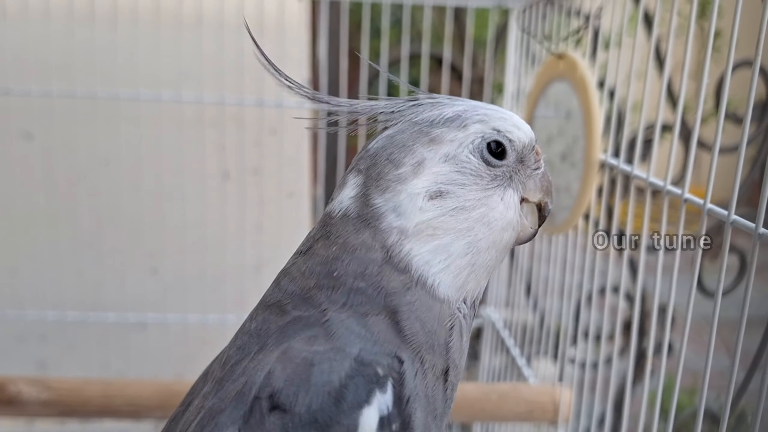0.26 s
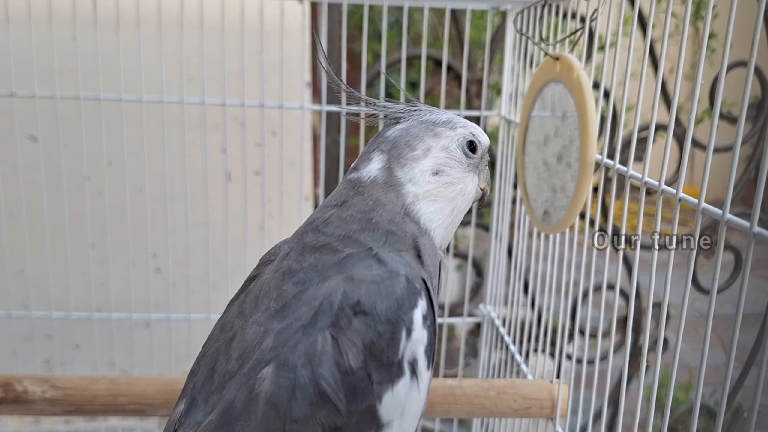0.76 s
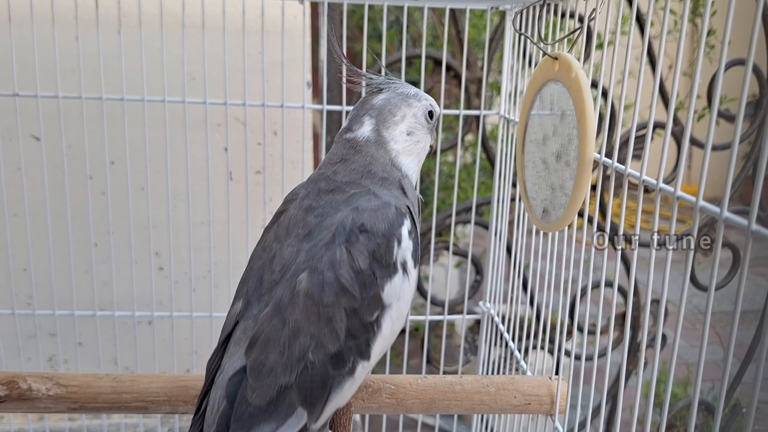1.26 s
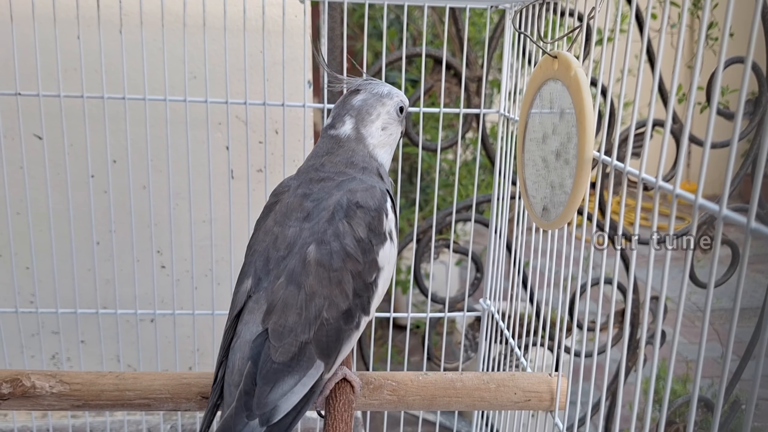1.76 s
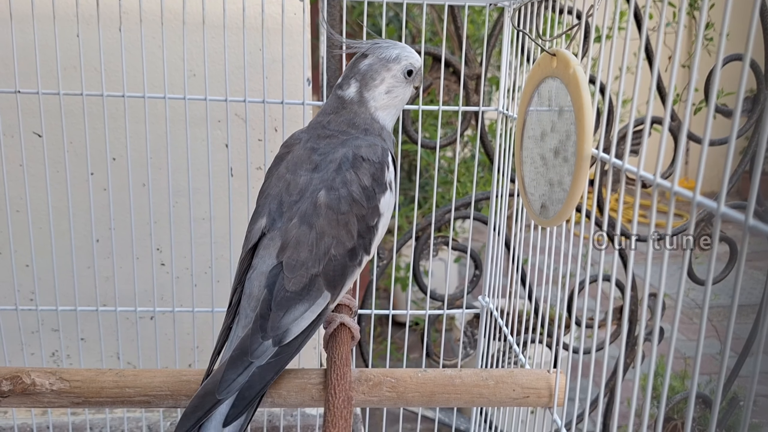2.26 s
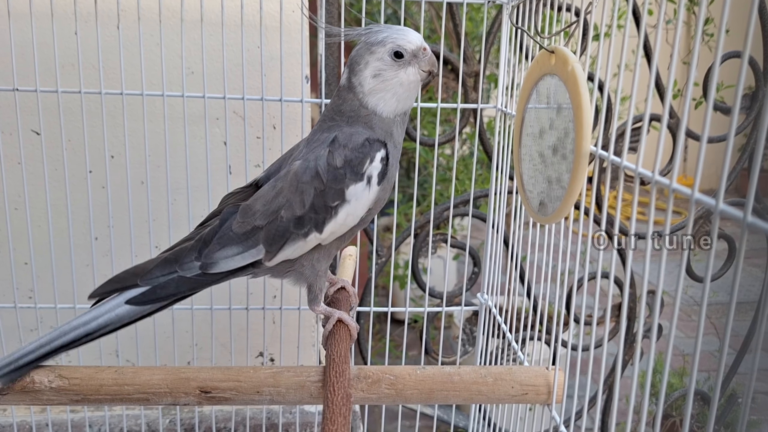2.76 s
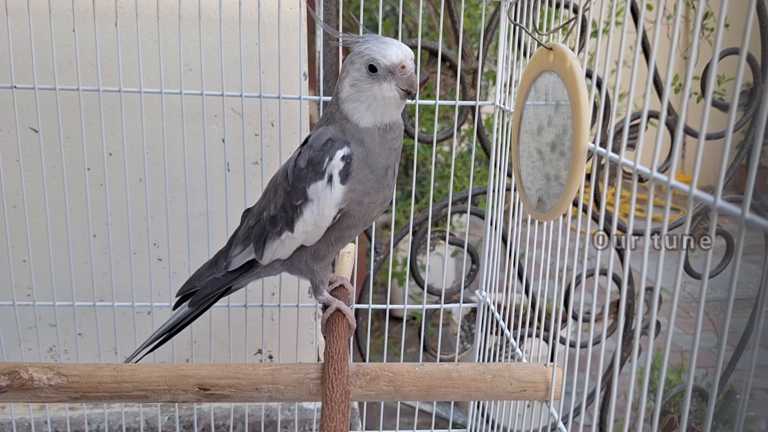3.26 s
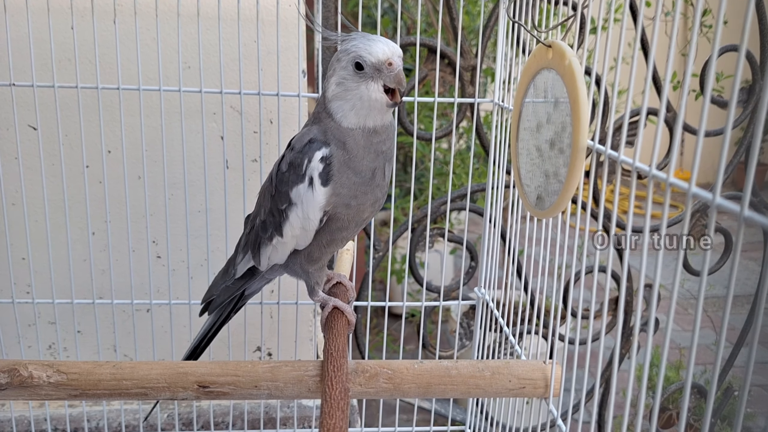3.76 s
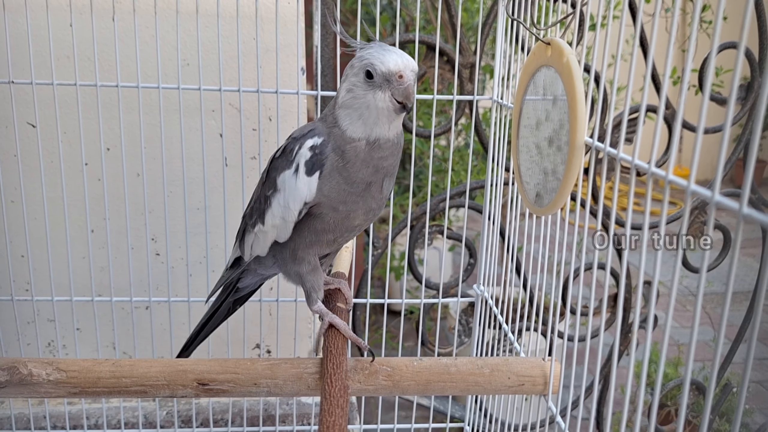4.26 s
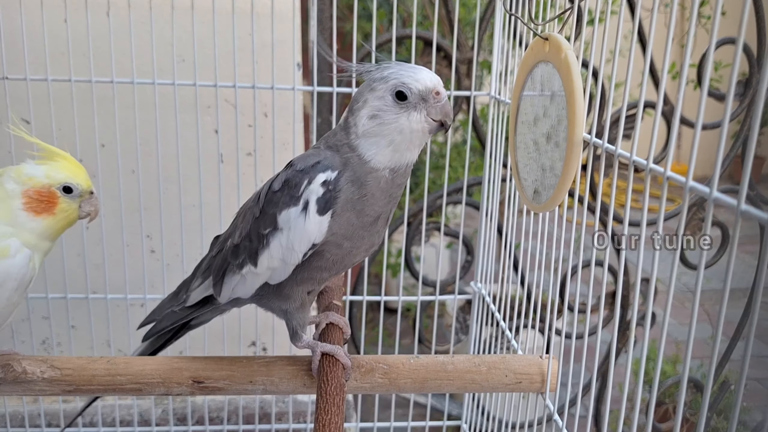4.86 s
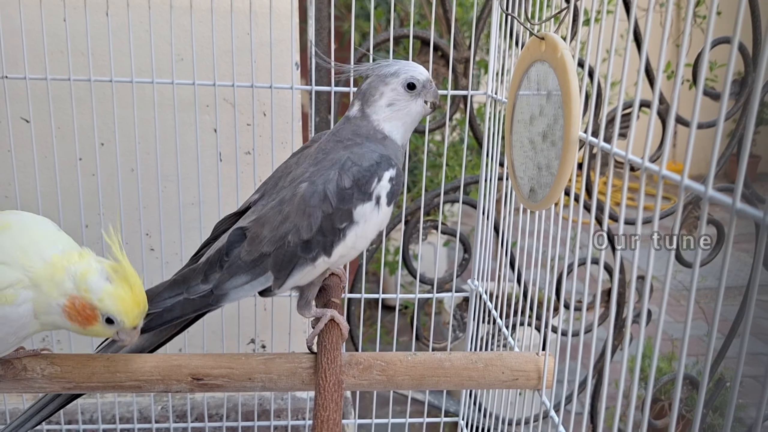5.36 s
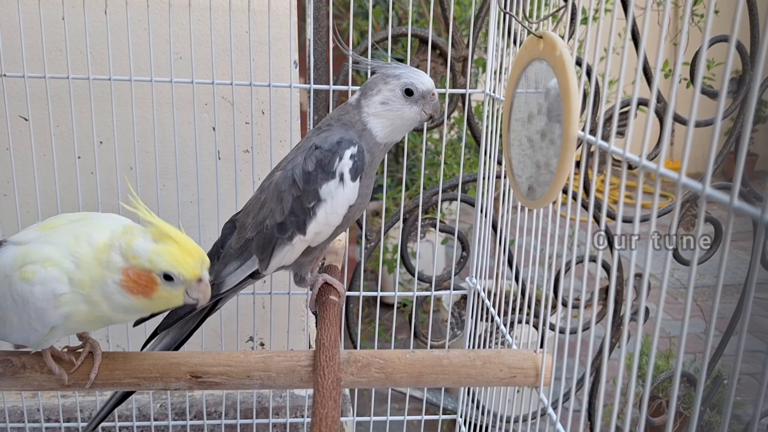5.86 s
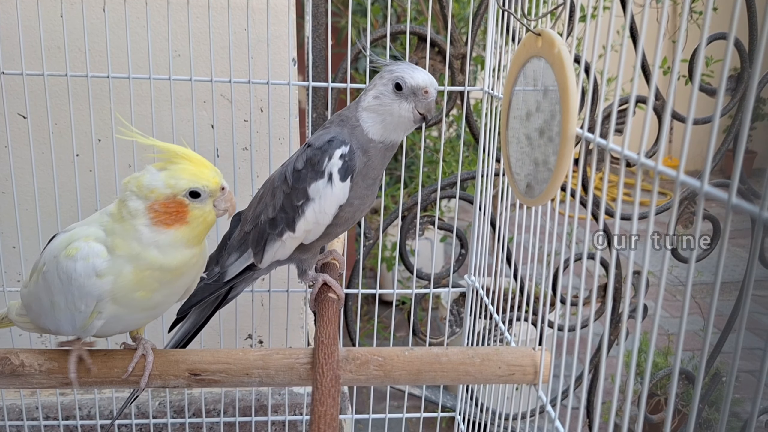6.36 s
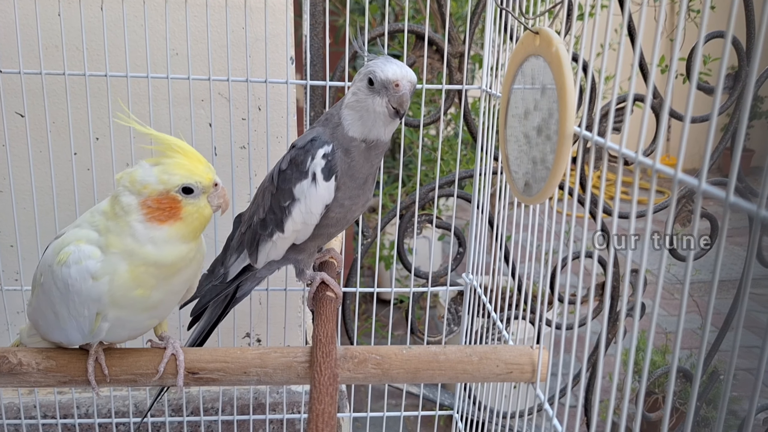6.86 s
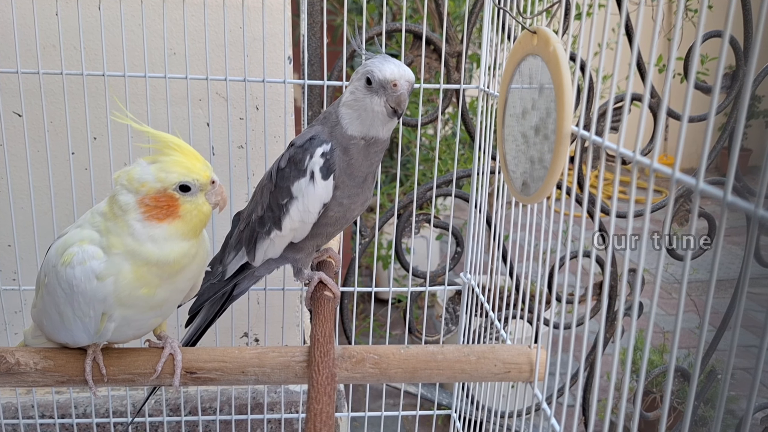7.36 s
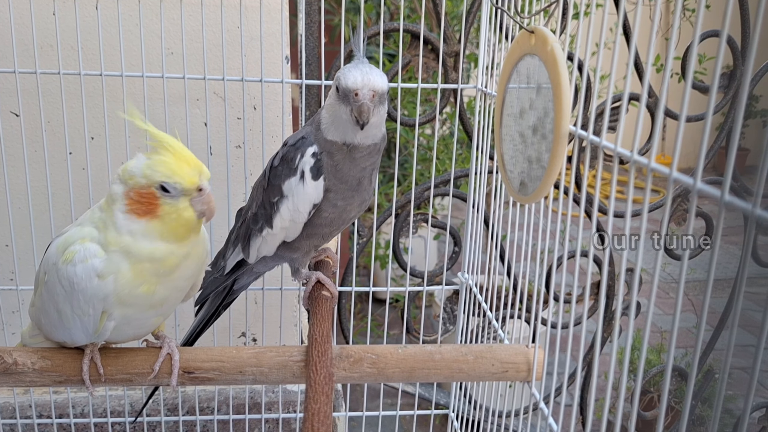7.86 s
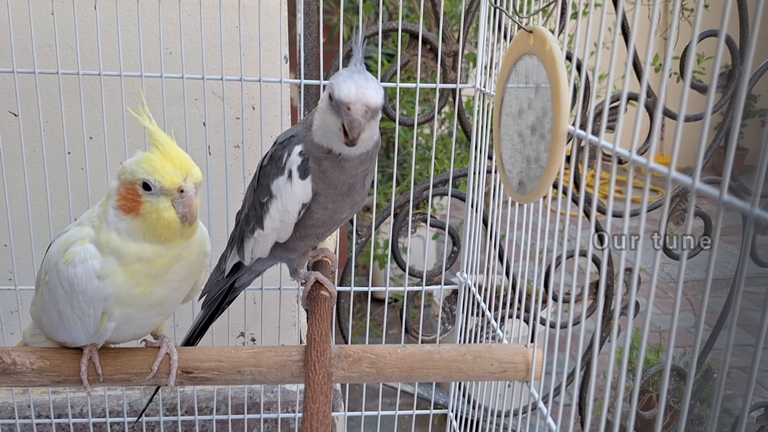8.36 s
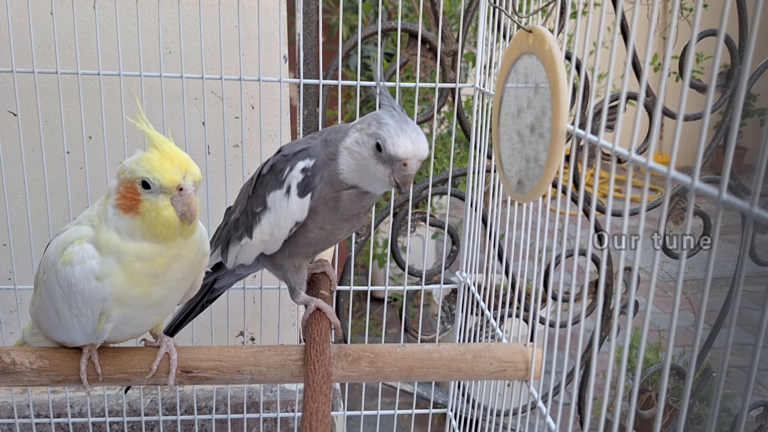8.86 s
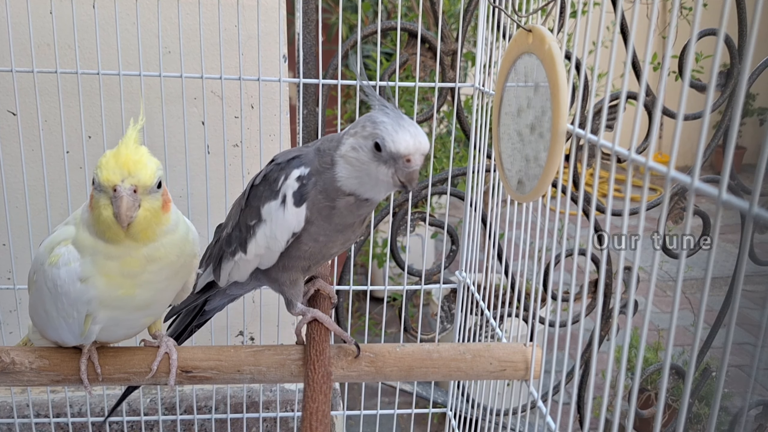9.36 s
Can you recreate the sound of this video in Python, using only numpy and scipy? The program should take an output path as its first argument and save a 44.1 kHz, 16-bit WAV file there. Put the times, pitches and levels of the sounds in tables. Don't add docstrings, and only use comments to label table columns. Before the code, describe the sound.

Outdoors between hard walls, a caged cockatiel opens with a loud, fast whistled run, then gives spaced swoops, a short trill and ringing high peals. Two breathy croaks interrupt before more sliding whistles and a late repeat of the opening run. Close, clear stereo pickup catches slight wall echo, feather rustle and small wire ticks, with distant sparrows and low rumble behind.

```python
import sys
import numpy as np
from scipy import signal
from scipy.fft import rfft, irfft, next_fast_len
from scipy.io import wavfile
from scipy.ndimage import uniform_filter1d, minimum_filter1d, map_coordinates

SR = 44100
rng = np.random.default_rng(int(sys.argv[2]) if len(sys.argv) > 2 else 0)


def wrap_up_sound(samples):
    columns = np.atleast_2d(samples).T
    tamed = np.clip(columns, -1, 1)
    steps = np.round(tamed * 32767).astype(np.int16)
    wavfile.write(sys.argv[1], SR, steps)


def boost_factor(decibels):
    exponent = np.asarray(decibels, float) / 20
    return 10 ** exponent


N = 424683
CLOCK = np.arange(N) / SR

# frequency in Hz, level in dB per Hz.
TOWN = [(25, -16), (60, 0), (130, -10), (420, -20), (2300, -33), (4200, -22), (6500, -34), (16000, -54)]
# time in seconds, level in dB.
TOWN_DB = [(0, -51.5), (.4, -53.5), (0.801, -57), (1.401, -52.5), (3.301, -52), (3.7, -52), (3.95, -51),
           (4.15, -48.5), (4.5, -55), (5.8, -52), (6.2, -53), (7.3, -51), (7.55, -47), (7.9, -50),
           (8.6, -52.5), (9.63, -49)]
# frequency in Hz, likeness from 0 to 1.
TOWN_ALIKE = [(40, 1), (130, 0.6), (290, 0.57), (600, 0.43), (2000, 0.026)]

# seconds after the start, share of the top pitch, level in dB.
CHIRRUP = [(0, .68, -12), (.022, .99, 0), (.03, .95, -2), (.048, .64, -3), (.065, .62, -14),
           (.092, .77, -1), (.115, .6, -8)]
CHEEP = [(0, .98, -6), (.012, .99, 0), (.035, .77, -1), (.07, .62, -3), (.1, .56, -10)]
SLUR = [(0, .78, -4), (.015, .71, 0), (.055, .7, 0), (.075, .99, -3)]
# start in seconds, top pitch in Hz, level in dB, stretch as a factor.
CHIRRUPS = [(0.039, 6105, -36.5, 1.4), (1.373, 5480, -33, 1.23), (1.836, 5730, -29, 0.7),
            (2.265, 5460, -27.5, 0.64), (4.266, 5460, -30.5, 0.91), (4.963, 6145, -33, 1.42),
            (5.975, 5510, -30, 0.85), (6.983, 5700, -34, 1.1), (7.208, 5970, -42, 1.62),
            (8.515, 5540, -35, 0.87), (9.294, 6270, -30.5, 1.08)]
CHEEPS = [(0.493, 5210, -26.5, 0.79), (2.385, 5200, -27.5, 1.06), (4.632, 5200, -46.5, 0.86),
          (5.248, 5530, -41.5, 0.75), (5.5, 5312, -51, 0.63), (9.18, 5200, -38, 0.58),
          (2.871, 5660, -33.5, 0.52), (2.91, 5540, -31.5, 0.64), (3.278, 5620, -42.5, 1.34),
          (3.55, 5200, -31.5, 1.38), (4.037, 5200, -26, 0.54), (6.134, 5640, -36.5, 1.51),
          (6.547, 5230, -28.5, 1.06), (6.82, 5200, -39, 0.88), (7.596, 5270, -41.5, 0.83),
          (7.762, 5615, -31.5, 0.65)]
SLURS = [(2.795, 5090, -42, 0.68), (5.79, 4640, -39, .8)]

# place (0 start, 1 turning point, 2 end), pitch in Hz, level in dB.
CLIMB = [(0, 2140, -9), (.2, 2137, -6), (1, 2135, 0), (1.15, 2300, 0), (1.45, 2650, 1.5), (1.65, 2730, 1.5),
         (2, 2730, 0)]
CROWN = [(0, 3308, 7.5), (.4, 3364, 5.5), (.7, 3460, -3.5), (1, 3471, -4.5), (1.5, 3406, 0),
         (1.7, 3250, 3.5), (1.8, 3100, -8.5), (2, 2810, -8)]
MUTTER = [(0, 1978, -6), (1, 1829, 1.5), (2, 1853, 0)]
ARC = [(0, 2150, -11), (.3, 2540, -5), (.55, 2680, -2), (1, 2750, 0), (1.6, 2690, 0), (2, 2480, -5)]
PIP = [(0, 1749, -1), (1, 1791, 2), (2, 1845, -1)]
SCOOP = [(0, 2250, -20), (.18, 1840, 0), (.55, 1704, -2), (1, 1706, -1), (1.32, 1884, 2), (1.42, 2000, -10),
         (1.55, 2260, 4), (1.75, 2180, 1), (2, 2280, -8)]
SWELL = [(0, 1727, -15), (.16, 1610, -8.5), (.6, 1574, -0.5), (1, 1552, -1.5), (1.35, 1672, -2),
         (1.6, 1888, 3), (1.75, 1947, -0.5), (2, 1937, -10)]
DIP = [(0, 2200, -14), (.45, 1880, -4.5), (1, 1815, -1), (2, 2098, 5.5)]
LIFT = [(0, 1450, -9), (1, 1474, 0), (1.6, 1940, -0.5), (2, 1960, -4.5)]
TUMBLE = [(0, 2540, -17), (.17, 2576, -5), (.36, 2840, -4.5), (.78, 2800, -3.5), (.94, 2620, 2),
          (1, 1981, -4), (1.08, 1763, -2.5), (1.65, 1745, -1), (2, 1433, -6)]
DRAWL = [(0, 1880, -6.5), (1, 1583, -1.5), (1.42, 1698, -3), (1.75, 1570, -6), (2, 1370, -9.5)]
YELP = [(0, 1458, 0), (.3, 1745, -6.5), (.55, 2264, 3), (.75, 2565, 8), (1.22, 2615, 6), (1.28, 2296, 3),
        (1.45, 1874, 5), (1.65, 1740, -3), (2, 1377, -3.5)]
PEAL = [(0, 2500, -10.5), (.5, 2700, -5), (1, 2883, -12), (1.45, 2860, 3), (1.75, 2850, 5), (2, 2720, -10)]
SLIDE = [(0, 2033, -9.5), (.38, 1960, -3), (.68, 1822, -3.5), (1, 1758, -5.5), (1.33, 1878, 0),
         (1.5, 2000, 1.5), (1.73, 2325, -1), (2, 2437, -3)]
# start,
# turning point and end in seconds, pitch at the turn in Hz, level in dB.
CLIMBS = [
    (0.15, 0.196, .3, 2137, -13.5),
    (3.748, 3.79, 3.884, 2178, -19),
    (8.247, 8.294, 8.368, 2271, -20),
]
CROWNS = [
    (0.259, 0.32, .372, 3301, -10.5),
    (3.883, 3.907, 3.972, 3472, -16.5),
    (8.359, 8.406, 8.468, 3434, -15.5),
]
MUTTERS = [(0.37, 0.424, .452, 1838, -21), (3.974, 4.028, 4.075, 1880, -18.5),
           (8.468, 8.505, 8.54, 1902, -18.5)]
ARCS = [(.445, .54, .578, 2730, -23), (9.2, 9.25, 9.297, 2570, -12), (4.06, 4.13, 4.165, 2750, -25),
        (8.535, 8.63, 8.66, 2640, -21)]
PIPS = [(.555, .57, .587, 1830, -28), (.58, .59, .61, 2080, -26), (4.172, 4.19, 4.218, 1850, -29),
        (4.19, 4.205, 4.228, 2580, -22), (8.785, 8.8, 8.812, 2150, -38), (8.65, 8.665, 8.684, 1770, -23),
        (8.676, 8.695, 8.72, 2810, -29), (2.51, 2.535, 2.574, 2950, -30), (6.745, 6.77, 6.8, 2900, -35),
        (1.875, 1.89, 1.93, 2400, -38), (2.87, 2.89, 2.91, 2300, -42), (2.425, 2.46, 2.51, 2880, -36)]
TRILLS = [(0.837, 0.901, .94, 1955, -49), (2.639, 2.732, 2.776, 1664, -25.5),
          (6.893, 6.975, 7.0, 1643, -29), (9.295, 9.372, 9.375, 1717, -28)]
SCOOPS = [(4.642, 4.745, 4.832, 1702, -20.5)]
SLIDES = [(5.28, 5.401, 5.485, 1747, -18)]
DIPS = [(9.102, 9.178, 9.21, 1940, -26.5)]
SWELLS = [(1.064, 1.128, 1.2545, 1547, -21.5)]
LIFTS = [(2.506, 2.585, 2.65, 1499, -22.5), (6.738, 6.817, 6.898, 1462, -24.5)]
TUMBLES = [(1.351, 1.48, 1.59, 1976, -20.5), (4.897, 5.064, 5.178, 1917, -19.5),
           (5.552, 5.71, 5.815, 1977, -18.5), (9.407, 9.563, 9.68, 1888, -20.5)]
DRAWLS = [(1.692, 1.758, 1.975, 1588, -23), (5.92, 5.999, 6.212, 1576, -22.5)]
YELPS = [(1.974, 2.054, 2.125, 2603, -20), (6.195, 6.285, 6.347, 2435, -23)]
PEALS = [(2.199, 2.272, 2.428, 2874, -18), (6.451, 6.496, 6.585, 2834, -14.5)]
# a shape, its syllables, then 2nd, 3rd and 5th partial and overtones lost from turn to end, all in dB.
SONG = [(CLIMB, CLIMBS, (-1.5, -14.5, -21, 18.5)), (CROWN, CROWNS, (-19, -28, -59.5, 8)),
        (MUTTER, MUTTERS, (-34.5, -29, -38.5, 4)), (ARC, ARCS, (-35, -39, -31.5, -3.5)),
        (DIP, DIPS, (-11, -37, -19.5, 5)), (PIP, PIPS, (-38.5, -39.5, -57, 1)),
        (PIP, TRILLS, (-44.5, -51, -46, 3.5)), (SCOOP, SCOOPS, (-16, -26, -31.5, -12)),
        (SLIDE, SLIDES, (-4.5, -18, -32.5, -7)), (LIFT, LIFTS, (-43, -36.5, -44, -3)),
        (SWELL, SWELLS, (-21, -32.5, -44.5, -4)), (TUMBLE, TUMBLES, (-31.5, -30.5, -38.5, 23)),
        (DRAWL, DRAWLS, (-23, -24.5, -39.5, 8)), (YELP, YELPS, (-26, -40.5, -28, 13.5)),
        (PEAL, PEALS, (-37.5, -34.5, -43, 0))]

# start and end in seconds, roughness from 0 to 1.
HOARSE = [
    (.44, .49, .4),
    (3.8, 3.82, .4),
    (4.15, 4.24, .3),
    (8.55, 8.6, .25),
]
# start and end in seconds, stutters per second, depth 0 to 1.
FLUTTER = [
    (2.332, 2.39, 68, .75),
    (6.557, 6.585, 105, .6),
]
# start and end in seconds, level change in dB.
SLIPS = [(0.262, 0.2692, -4), (0.2747, .279, -4), (0.2864, 0.2952, -12), (.298, .304, -16.5),
         (0.312, 0.32, -20.5), (3.889, 3.894, -4), (8.3637, 8.371, -9.5), (8.3785, 8.385, -8)]
# start and end in seconds, level in dB.
SPLITS = [
    (2.65, 2.688, -15.5),
    (6.888, 6.928, -8.5),
    (9.3, 9.33, -15),
]
# start and end in seconds, level change in dB.
ACCENTS = [(0.148, 0.211, -1.5), (0.207, 0.236, 1), (.266, 0.289, 2.5), (0.429, 0.502, -5.5),
           (3.74, 3.768, -3.5), (0.228, 0.26, 1), (2.361, 2.436, -13), (2.656, 2.686, -7),
           (3.884, 3.904, -3), (4.908, 5.004, -5), (5.66, 5.7, 4.5), (6.888, 6.932, -9.5),
           (8.294, 8.352, 4), (9.263, 9.295, -4.5), (9.465, 9.528, -9.5)]
# time in seconds, left-right in dB, overtones in dB.
HEAD = [(.2, -1, 5), (1.9, 1, -0.5), (3.8, 0, 12), (4.7, 1, 4), (5.4, -1.5, 5), (6.1, 0, 10),
        (6.28, 2, 9.5), (6.45, -0.5, 11), (6.8, -2, 10.5), (8.3, 2, 7), (9.2, -2, 9)]
# start and end in seconds, 2nd partial in dB, higher in dB.
GAPES = [(0.132, 0.205, -8.5, -3), (0.205, 0.257, -10, -4.5), (0.255, 0.372, -4.5, -4.5),
         (0.372, 0.623, 5, -8), (4.91, 5.062, -12.5, -3), (8.226, 8.291, -0.5, -4.5),
         (8.304, 8.351, -2, -9.5), (8.467, 8.543, 4, -12.5), (3.75, 3.8, -3, 2.5), (3.813, 3.877, 2.5, -6),
         (3.913, 3.97, 3, -8), (4.64, 4.695, -18, -4.5), (4.786, 4.834, -31, -14.5),
         (5.07, 5.179, -11, -17), (5.283, 5.352, -25, -11), (5.335, 5.433, -2.5, 3),
         (5.433, 5.492, -35, -12.5), (5.587, 5.697, -2, -11.5), (5.717, 5.82, -5, -10),
         (5.939, 5.996, -10, -2), (5.999, 6.198, -16, -4.5), (6.246, 6.314, -13, -2.5),
         (6.776, 6.9, 4.5, 2), (8.346, 8.463, 12, 3), (9.1, 9.213, -27, 3.5), (9.41, 9.636, -7, -1.5)]
# frequency in Hz, level in dB.
THROAT = [(1500, 0.5), (2250, 3), (2600, 2.5), (2900, 0), (3400, -0.5)]
# frequency in Hz, level in dB.
BEAK = [(2800, -14), (3500, 9), (4500, 8), (6000, -7.5), (8500, 6.5), (10000, -5), (12000, 5), (16000, -2)]
LOWER_HZ = 2715

# start in seconds, length in seconds, rustle in dB, scuffle in dB.
STIR = [(0.428, 0.31, -43, -51), (1.313, 0.29, -42, -50), (1.781, 0.9, -43.5, -58), (2.171, 1, -46, -56.5),
        (2.696, 0.33, -63, -77.5), (2.97, 0.2, -48.5, -53), (3.281, 1, -48.5, -89), (3.931, 0.36, -33, -60),
        (4.049, 0.27, -62, -43.5), (4.6, 0.32, -47, -66), (4.891, 0.4, -43.5, -48.5),
        (5.293, 1, -45.5, -66.5), (5.537, .25, -49.5, -50), (5.889, 0.48, -47, -56.5),
        (6.295, 0.83, -45.5, -52), (6.841, 0.36, -49, -46.5), (7.509, 0.42, -47.5, -55),
        (8.208, 0.67, -36, -77.5), (8.523, 0.26, -46.5, -48.5), (8.812, 1, -48, -50.5)]
# frequency in Hz, level in dB per Hz.
FEATHER = [(1000, -24), (2500, -0.5), (5000, 1.5), (8000, -7.5), (9500, -19.5), (12500, -7.5),
           (16000, -23.5)]
SCUFFLE = [(300, -27.5), (600, -3), (1100, -1.5), (1800, 2.5), (3000, -29.5)]
# time in seconds, wire level in dB, perch level in dB.
TICKS = [(0.822, -51.5, -73), (0.839, -52.5, -72), (.89, -45, -60), (0.959, -34.5, -65),
         (1.3413, -41, -49.5), (2.6891, -30, -60), (2.6994, -28, -60), (3.003, -52, -70), (3.02, -45, -72),
         (3.0437, -38.5, -50), (3.07, -42, -70), (3.1, -49.5, -69), (7.5284, -38.5, -49.5),
         (8.9584, -38.5, -35)]
# frequency in Hz, width in Hz, level in dB.
WIRE = [(2000, 450, 9.5), (5200, 400, 19), (6640, 280, 4.5), (7480, 1400, 13.5), (10950, 700, 13.5),
        (12300, 750, 3), (14960, 1200, 6)]
# start and length in seconds, level in dB, pulses per second, seconds to the loudest point.
CROAKS = [
    (3.415, 0.11, -22.5, 85, .027),
    (3.626, 0.1, -19, 115, .045),
]
# frequency in Hz, width in Hz, level in dB.
CROAK_THROAT = [(2200, 290, 0.5), (4350, 520, 9.5), (6260, 450, 10.5), (8580, 1400, 0)]

# frequency in Hz, time to fall 60 dB in seconds.
WALLS = [(1000, .4), (2500, .39), (4000, .2), (12000, .12)]
YARD = [(2500, .5), (6000, .42)]
# frequency in Hz, left over right in dB.
PORT_TILT = [(300, -0.5), (1700, -0.5), (1900, -4), (2200, 10), (2800, 2.5), (3450, -6), (8000, -3),
             (15000, -8)]
# frequency in Hz, lead in radians.
PORT_LEAD = [(0, .1), (1900, 1.4), (2400, 3), (2650, 6), (3200, 7.3), (4400, 10.6), (16000, 15)]
LEFT_RIGHT = np.array([[.5], [-.5]])


def unit(x):
    return x / np.sqrt(np.mean(x ** 2) + 1e-20)


def along(points, hz):
    f, v = np.transpose(points)
    return np.interp(np.log(hz + 1), np.log(f + 1), v)


def wobble(rate, size=N):
    knots = rng.standard_normal(int(size * rate / SR) + 4)
    return map_coordinates(knots, [np.arange(size) * rate / SR])


def add(out, x, s):
    part = out[..., round(s * SR):][..., :x.shape[-1]]
    part += x[..., :part.shape[-1]]


def window(t, start, end, edge):
    return np.clip(np.minimum(t - start, end - t) / edge, 0, 1)


def marked(rows, edge):
    return sum(value * window(CLOCK, start, end, edge) for start, end, value in rows)


def filtered(x, response):
    m = next_fast_len(N + SR // 2)
    return irfft(rfft(x, m) * response(np.fft.rfftfreq(m, 1 / SR)), m)[..., :N]


def resonances(modes):
    def response(f):
        total = 0
        for k, (centre, width, db) in enumerate(modes):
            damping = 1j * f * width
            total = total + (-1) ** k * boost_factor(db) * damping / (centre * centre - f * f + damping)
        return total
    return response


def noise(spectrum, alike):
    def response(hz):
        turn = np.arccos(np.clip(along(alike, hz), -1, 1)) / 2
        return boost_factor(along(spectrum, hz)) * np.array([np.cos(turn), np.sin(turn)])
    mid, side = filtered(rng.standard_normal((2, N)), response)
    return unit(np.array([mid + side, mid - side]))


def patchy(x, depth_db):
    z = signal.stft(x, nperseg=512)[2]
    field = uniform_filter1d(rng.standard_normal(z.shape[1:]), size=10, axis=0)
    field = uniform_filter1d(field, size=8, axis=1)
    return signal.istft(z * boost_factor(depth_db * unit(field)), nperseg=512)[1][:, :N]


def town():
    level_db = np.interp(CLOCK, *np.transpose(TOWN_DB))
    return boost_factor(level_db + 1.2 * wobble(1.5) + .8 * wobble(7)) * noise(TOWN, TOWN_ALIKE)


def sparrows():
    out = np.zeros(N)
    for shape, calls in ((CHIRRUP, CHIRRUPS), (CHEEP, CHEEPS), (SLUR, SLURS)):
        u, share, shape_db = np.transpose(shape)
        for s, top_hz, db, stretch in calls:
            t = np.arange(round(u[-1] * stretch * SR)) / SR
            burr = 1 + .03 * wobble(60, size=len(t)) + .015 * wobble(500, size=len(t))
            pitch = top_hz * uniform_filter1d(np.interp(t / stretch, u, share), size=200) * burr
            phase = 2 * np.pi * np.cumsum(pitch) / SR
            swell = boost_factor(db + np.interp(t / stretch, u, shape_db) + 4 * wobble(140, size=len(t)))
            voices = np.sin(phase) + .3 * np.sin(.82 * phase)
            add(out, swell * window(t, 0, t[-1], .008) * voices, s)
    return out


def stutter():
    gate = np.ones(N)
    for start, end, rate, depth in FLUTTER:
        closing = np.sin(np.pi * rate * (CLOCK - start)) ** 2
        gate -= np.clip(depth, 0, 1) * window(CLOCK, start, end, 0.0047) * closing
    return gate


def song():
    out = np.zeros((2, N))
    trilling = marked([(start, end, 1) for start, _, end, *_ in TRILLS], .005)
    muttering = marked([(start, end, 1) for start, _, end, *_ in MUTTERS], .008)
    rough = .045 + marked(HOARSE, .008) + .3 * trilling + .3 * muttering
    shake, tremble = rough * wobble(420), rough * wobble(160)
    trill = .085 * trilling * np.cos(2 * np.pi * 55 * CLOCK + 3 * wobble(45))
    gate = stutter()
    head_s, head_pan, head_open = np.transpose(HEAD)
    pan_db, open_db = np.interp(CLOCK, head_s, head_pan), np.interp(CLOCK, head_s, head_open)
    octave_db = marked([(start, end, db) for start, end, db, _ in GAPES], .008)
    upper_db = marked([(start, end, db) for start, end, _, db in GAPES], .008)
    slip = marked([(start, end, 1) for start, end, _ in SLIPS], .0015)
    accent_db = marked(ACCENTS, .004) + marked(SLIPS, .0015)
    split = marked([(start, end, boost_factor(db)) for start, end, db in SPLITS], .004) * boost_factor(4 * wobble(150))

    for shape, rows, (second_db, third_db, fifth_db, lost_db) in SONG:
        place, shape_hz, shape_db = np.transpose(shape)
        partials_db = [0, second_db, third_db, fifth_db, -36.5]
        partials_db = np.interp(np.arange(1, 10), [1, 2, 3, 5, 9], partials_db)
        climbing = shape == CLIMB
        edge = .008 / 3 if climbing or shape == CROWN else .008
        for start, turn, end, key_hz, level_db in rows:
            span = slice(round(start * SR), round(end * SR))
            t = CLOCK[span]
            knots = np.interp(place, [0, 1, 2], [start, turn, end])
            hz = shape_hz * key_hz / np.interp(1, place, shape_hz)
            stop = end
            if climbing:
                hz = np.minimum(hz, LOWER_HZ)
                stop = min([end] + [crown[0] + .002 for crown in CROWNS if start < crown[0]])

            drawn = np.interp(t, knots, hz)
            pitch = uniform_filter1d(drawn, 260) * (1 + .1 * shake[span] + trill[span])
            pitch = pitch - slip[span] * np.clip(pitch - LOWER_HZ, 0, None)
            phase = 2 * np.pi * np.cumsum(pitch) / SR

            glide = uniform_filter1d(np.abs(np.gradient(drawn)) * SR / pitch, 400)
            choke_db = 1.4 * np.minimum(glide, 12)
            purity_db = 9 * np.exp(-(t - start) / .045) + np.interp(t, [turn, end], [0, lost_db]) - open_db[span]
            tone = np.sin(phase) * boost_factor(partials_db[0])
            for k, partial_db in enumerate(partials_db[1:], 2):
                gape_db = (octave_db if k == 2 else upper_db)[span]
                colour_db = along(BEAK, k * pitch) + gape_db - purity_db - choke_db
                colour_db = colour_db + 2 * wobble(30, size=len(t))
                tone = tone + boost_factor(partial_db + colour_db) * (k * pitch < SR / 2.75) * np.sin(k * phase)
            tone = tone + split[span] * (.5 * np.sin(phase / 2) + np.sin(3 * phase / 2))

            swell_db = np.interp(t, knots, shape_db + level_db) + along(THROAT, pitch)
            swell = boost_factor(swell_db + accent_db[span] + 6.8 * tremble[span])
            out[:, span] += np.sqrt(2) * tone * swell * gate[span] * window(t, start, stop, edge)
    return out * boost_factor(pan_db * LEFT_RIGHT)


def stirring(column):
    gain = np.zeros(N)
    for row in STIR:
        since = CLOCK - row[0]
        fall = boost_factor(-14 * np.clip(since / row[1], 0, 9) ** 2)
        gain += boost_factor(row[column]) * np.clip(since / .045, 0, 1) * fall
    return gain


def feathers(voice):
    breath = boost_factor(-45) * np.sqrt(np.abs(uniform_filter1d(voice ** 2, size=900)))
    grains = boost_factor(2.5 * wobble(15) + 2.4 * wobble(240))
    rustle = unit(grains * patchy(noise(FEATHER, [(1000, 0.12)]), depth_db=4))
    return (stirring(2) + breath) * rustle


def scuffle():
    return stirring(3) * unit(boost_factor(3.5 * wobble(22)) * noise(SCUFFLE, [(500, .4)]))


def ticks():
    cracks, knocks, t = np.zeros(N), np.zeros(N), np.arange(SR // 20) / SR
    for s, wire_db, perch_db in TICKS:
        add(cracks, boost_factor(wire_db - 60 * t / .008) * rng.standard_normal(len(t)), s)
        add(knocks, boost_factor(perch_db - 60 * t / .03) * rng.standard_normal(len(t)), s)
    perch = [(630, 150, 0.0065)]
    return filtered(cracks, resonances(WIRE)) + filtered(knocks, resonances(perch))


def croaks():
    source = np.zeros(N)
    for s, length, db, rate, top_s in CROAKS:
        t = np.arange(round(length * SR)) / SR
        beat = np.cumsum(rate * (1 + 0.3 * wobble(40, size=len(t)))) / SR % 1
        pulses = .7 + np.sin(np.pi * beat ** .5) ** 4
        burst = unit(pulses * boost_factor(2 * wobble(60, size=len(t))) * rng.standard_normal(len(t)))
        swell_db = np.interp(t, [0, top_s, length], [-7.5, 0, -16.5])
        add(source, boost_factor(db + swell_db) * burst * window(t, 0, length, .006), s)
    return filtered(source, resonances(CROAK_THROAT))


def echo(x, decay, gap_s, block=SR // 4):
    out = np.zeros((2, N + 2 * SR))
    for at in range(0, N, block):
        hz, t, z = signal.stft(rng.standard_normal((2, SR * 3 // 4)), SR, nperseg=256)
        fall = boost_factor(-60 * t / along(decay, hz)[:, None])
        tail = signal.istft(z * fall, SR, nperseg=256)[1]
        tail = tail / np.linalg.norm(tail[0])
        add(out, signal.fftconvolve(x[None, at:at + block], tail, axes=1), at / SR + gap_s)
    return out[:, :N]


def ports(x):
    def response(hz):
        lead = np.interp(hz, *np.transpose(PORT_LEAD))
        return boost_factor(LEFT_RIGHT * along(PORT_TILT, hz)) * np.exp(1j * LEFT_RIGHT * lead)
    return filtered(x, response)


def scene():
    far, voice = sparrows(), song()
    mono = voice.mean(0)
    small = ticks() + croaks()
    near = town() + boost_factor(-4.5) * far + boost_factor(-.7) * voice + feathers(mono) + scuffle() + small
    walls = boost_factor(-14) * echo(mono + boost_factor(9) * small, WALLS, gap_s=.006)
    yard = boost_factor(1.2) * echo(far, YARD, gap_s=.004)
    return ports(near) + walls + yard


def top_cut(x):
    return signal.sosfilt(signal.butter(12, 16600, fs=SR, output="sos"), x)


def record(dry):
    need = np.minimum(1, .9 / (np.abs(dry).max(0) + 1e-9))
    held = dry * uniform_filter1d(minimum_filter1d(need, size=400), size=200)
    mix = filtered(held, lambda hz: hz < 15950)
    return top_cut(mix)


dry = scene()
out = record(dry)
wrap_up_sound(out)
```